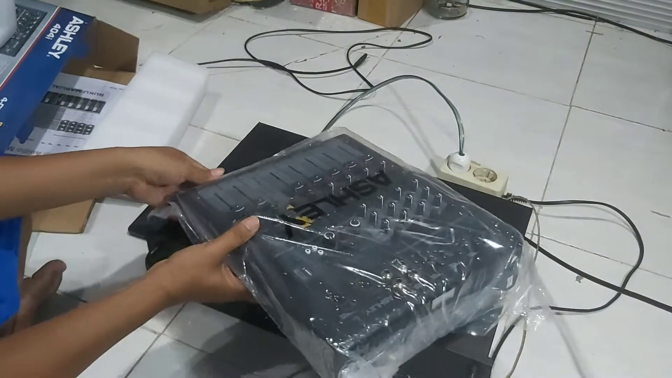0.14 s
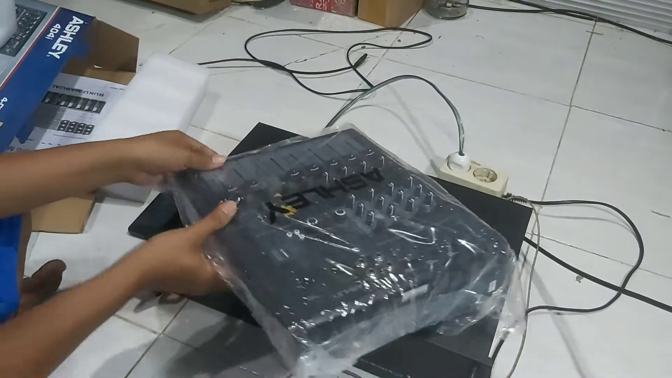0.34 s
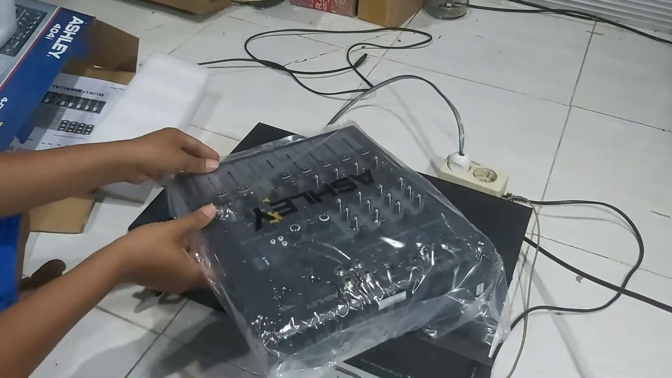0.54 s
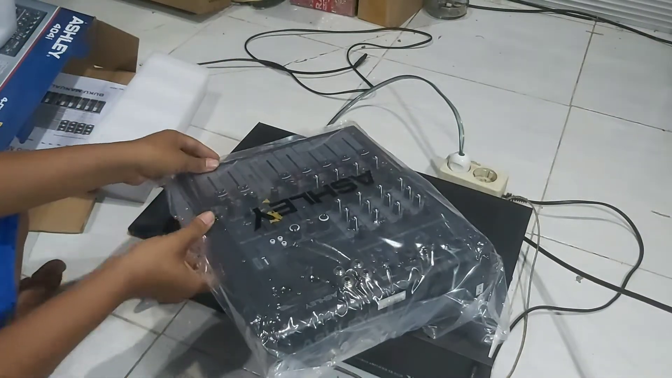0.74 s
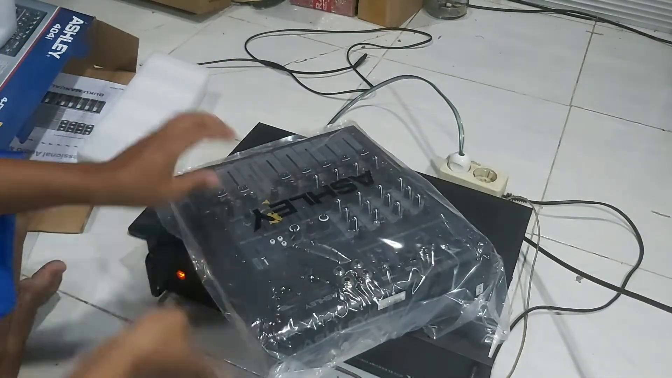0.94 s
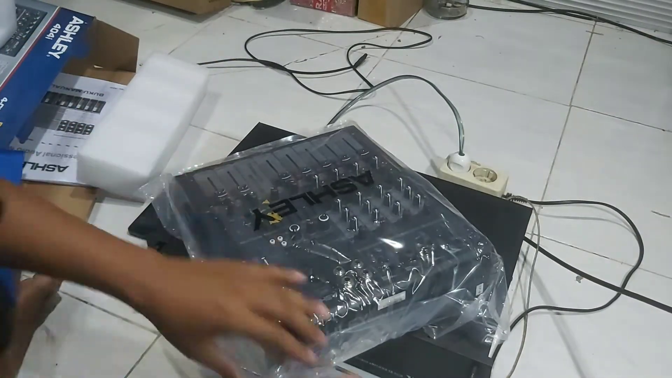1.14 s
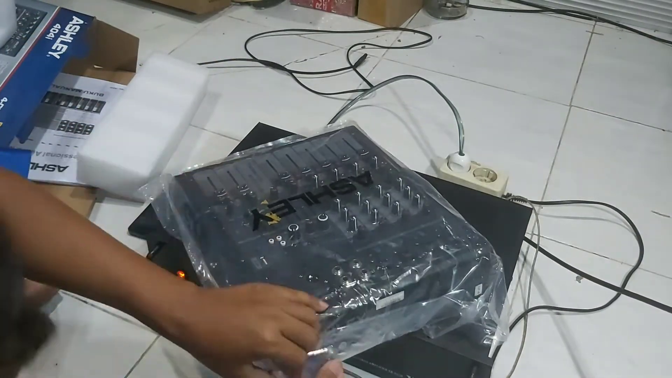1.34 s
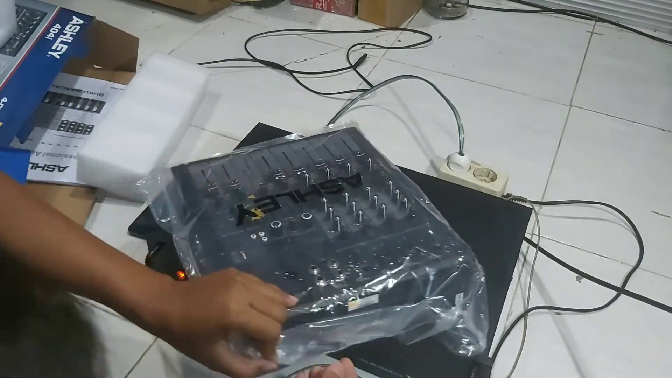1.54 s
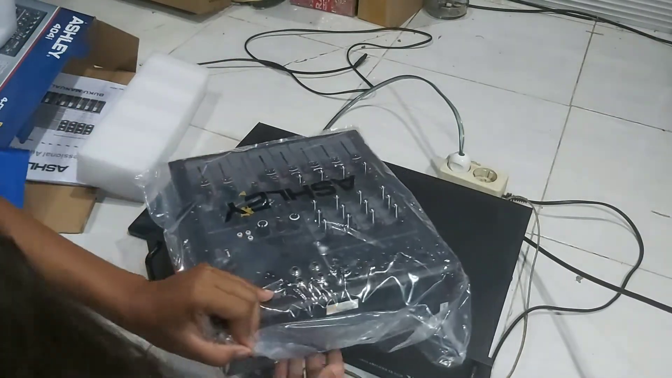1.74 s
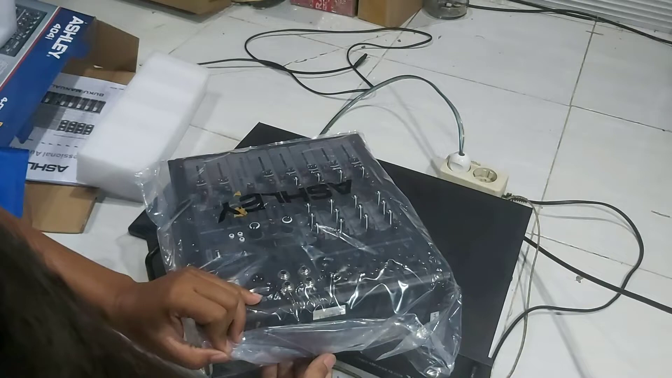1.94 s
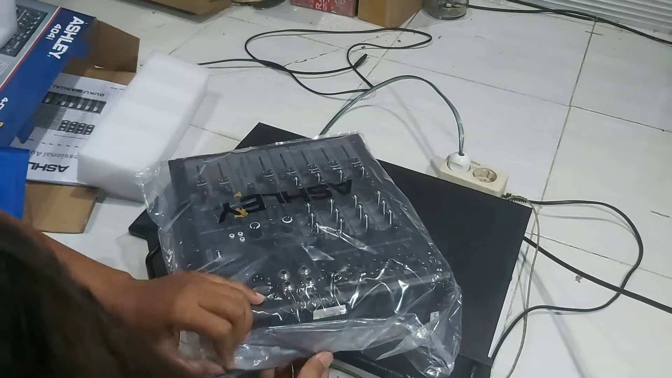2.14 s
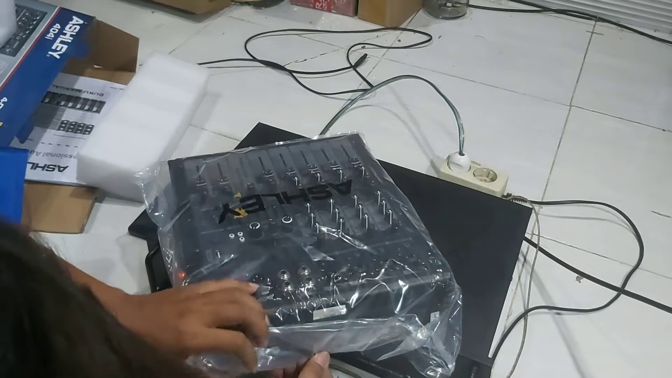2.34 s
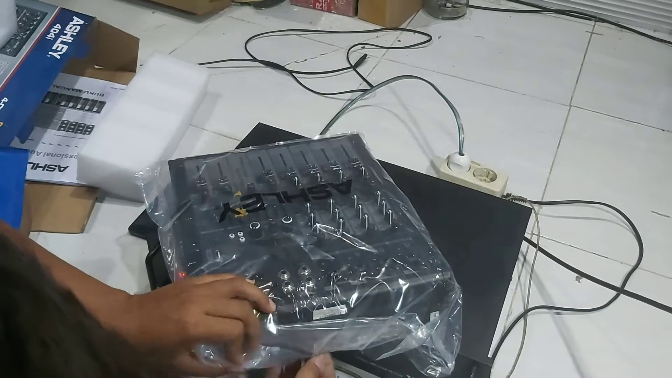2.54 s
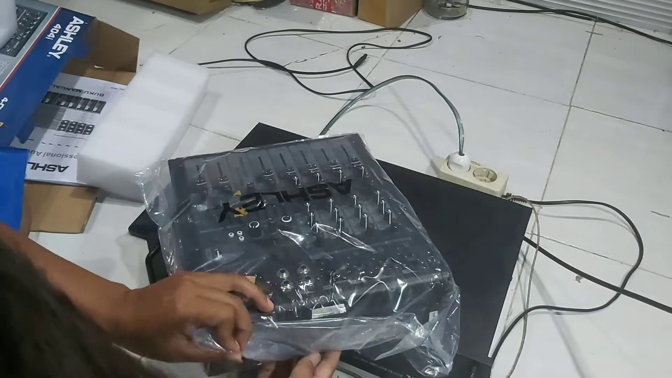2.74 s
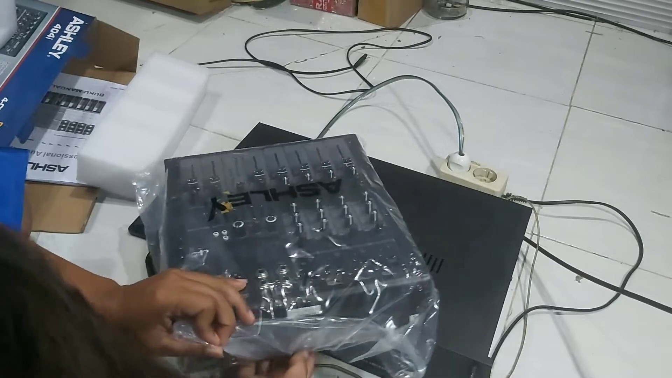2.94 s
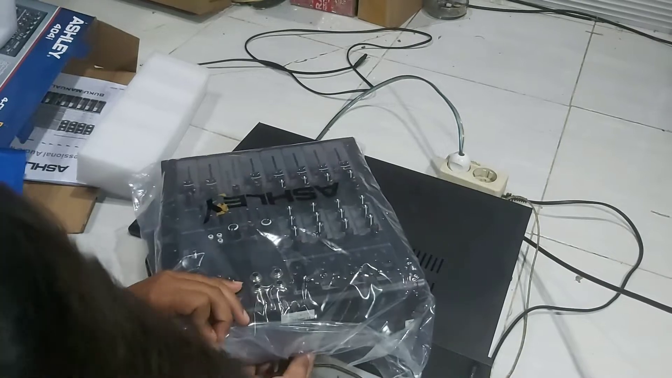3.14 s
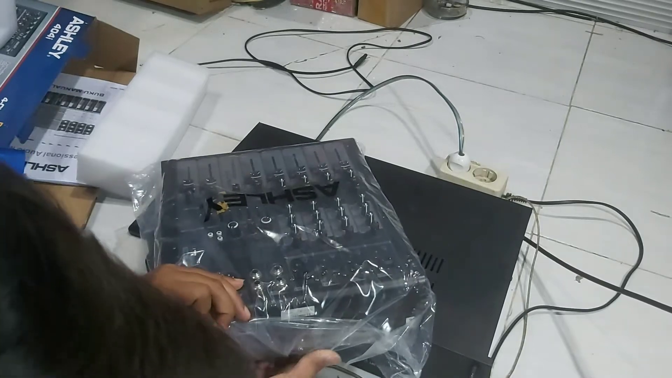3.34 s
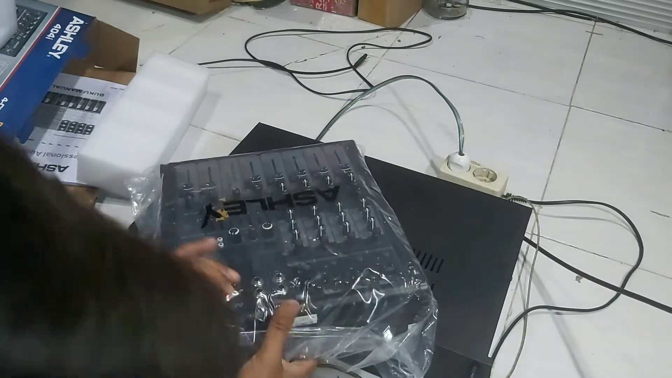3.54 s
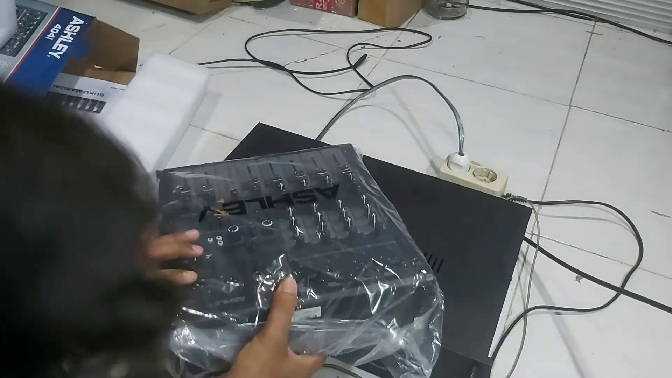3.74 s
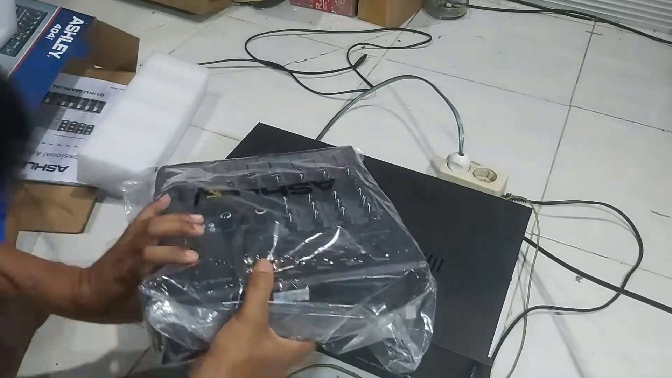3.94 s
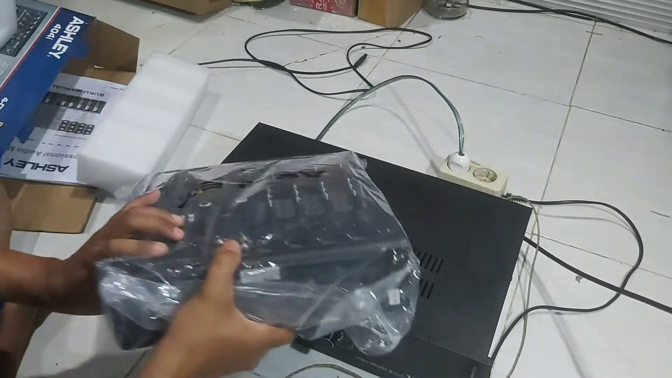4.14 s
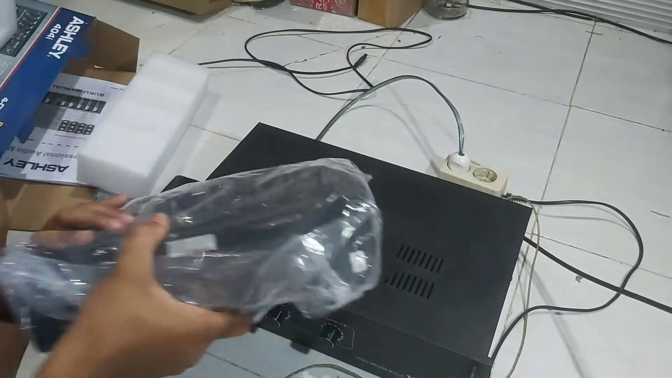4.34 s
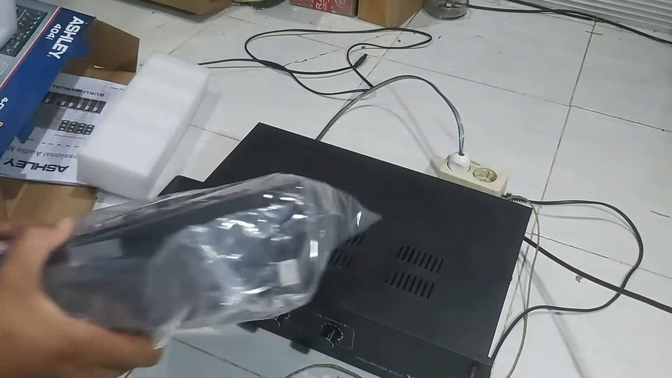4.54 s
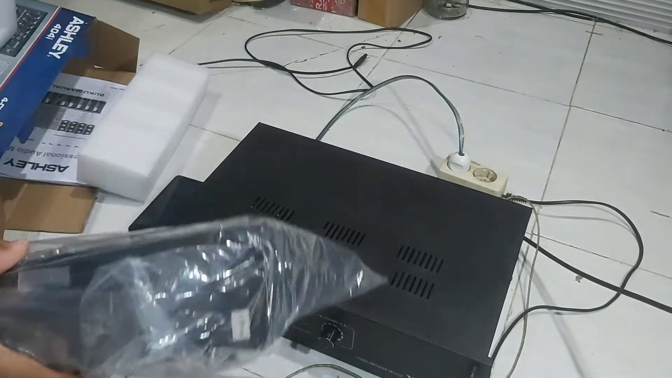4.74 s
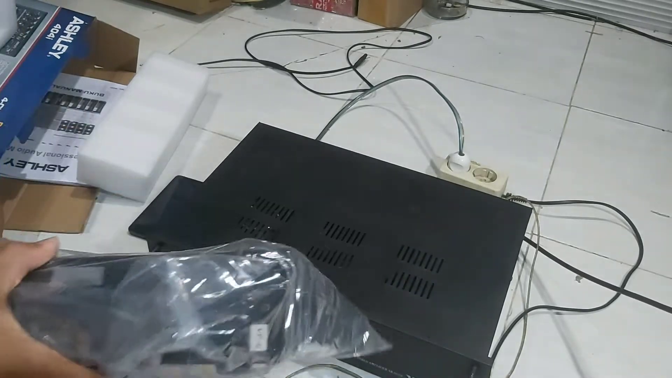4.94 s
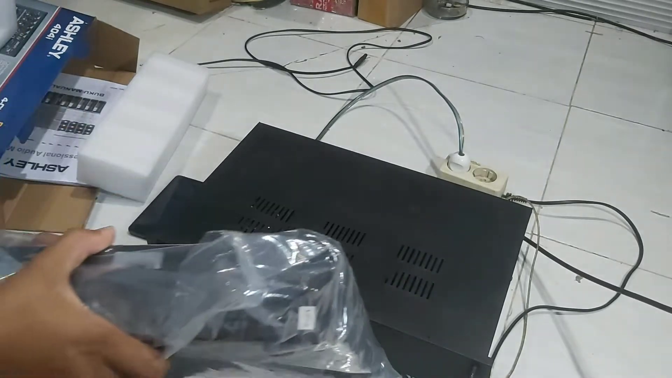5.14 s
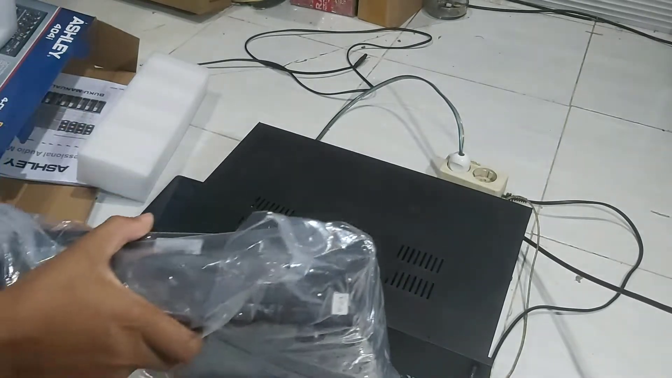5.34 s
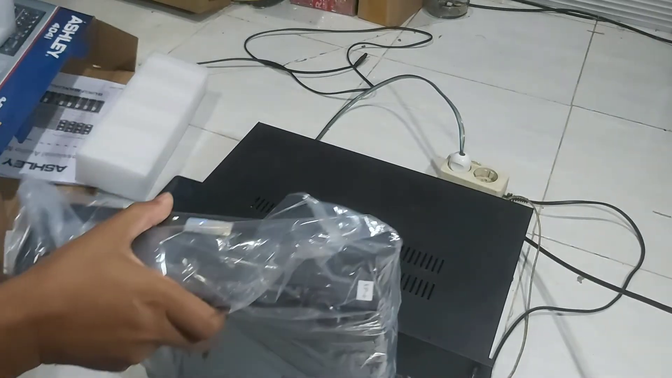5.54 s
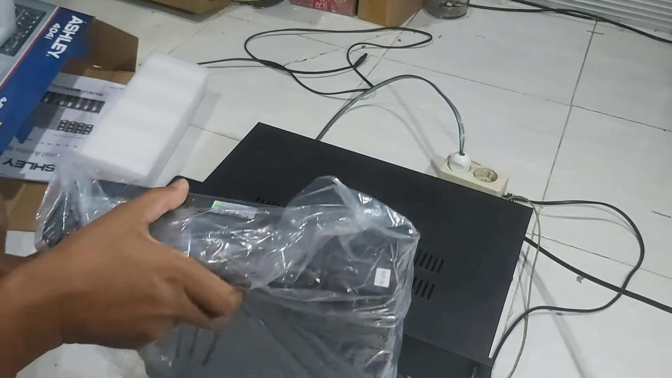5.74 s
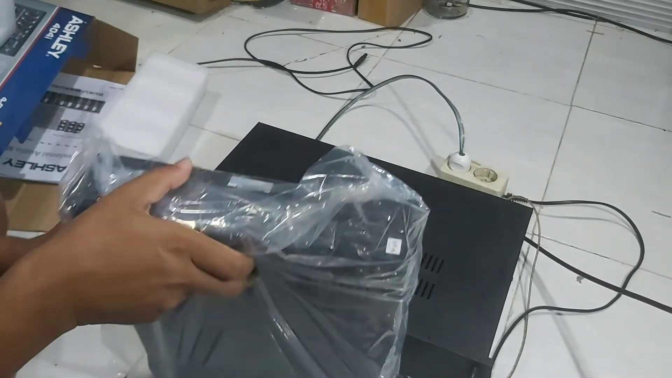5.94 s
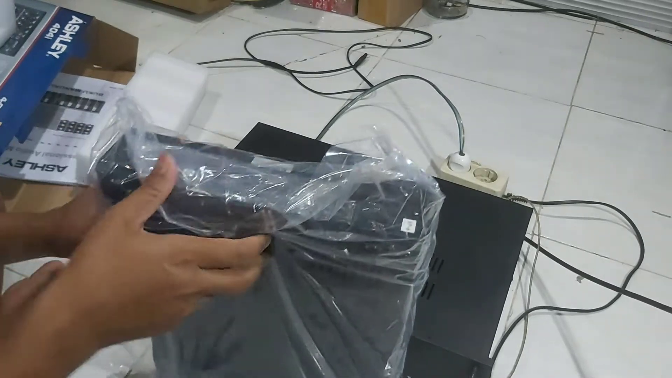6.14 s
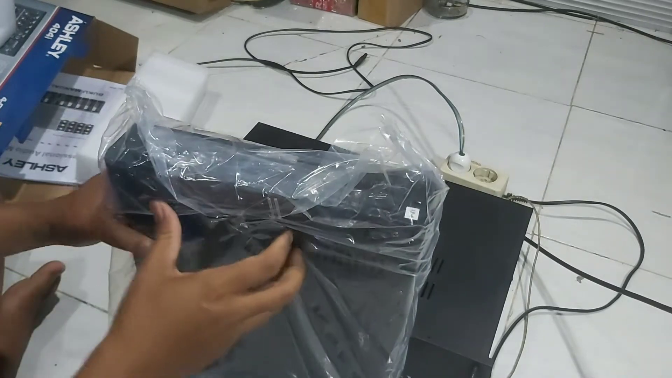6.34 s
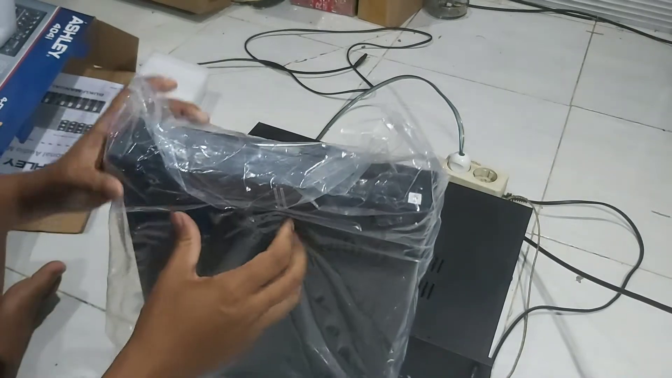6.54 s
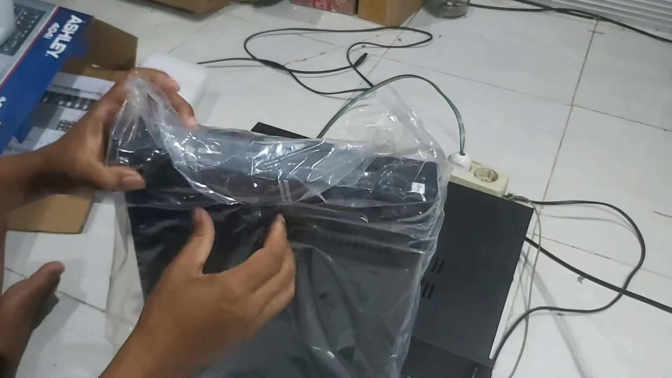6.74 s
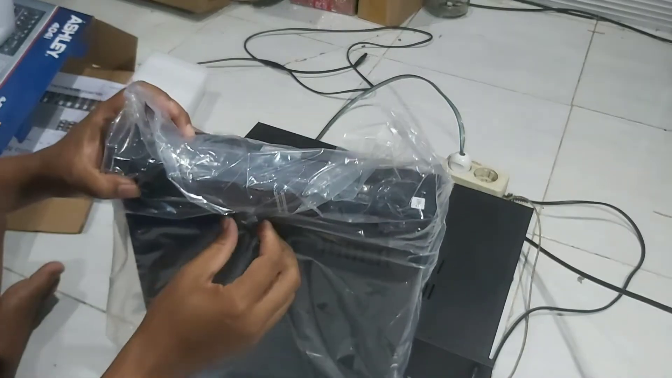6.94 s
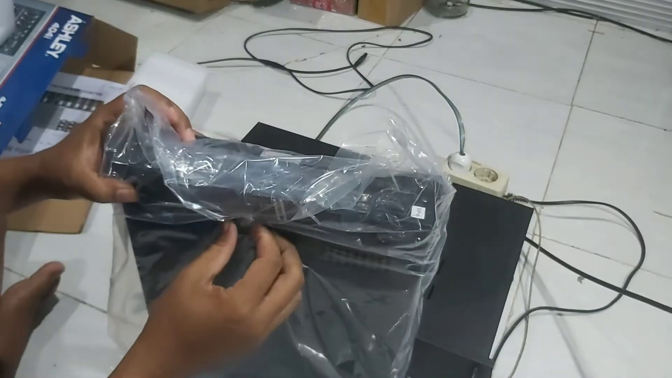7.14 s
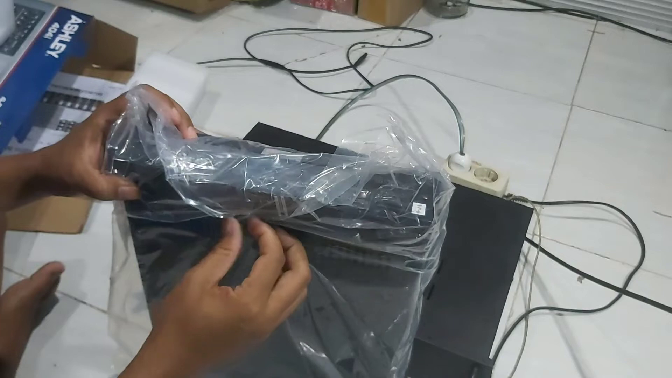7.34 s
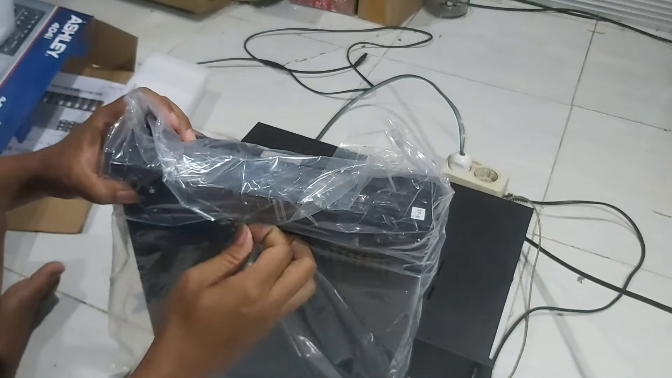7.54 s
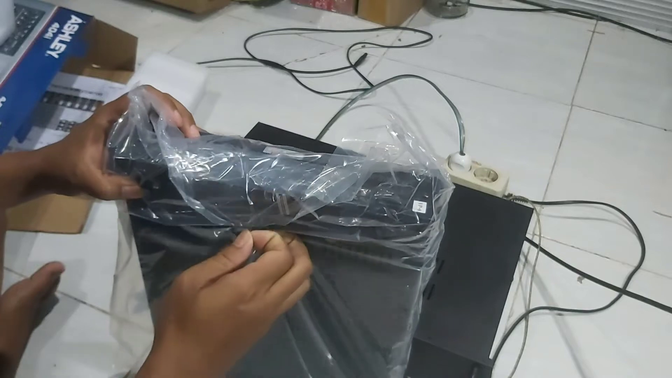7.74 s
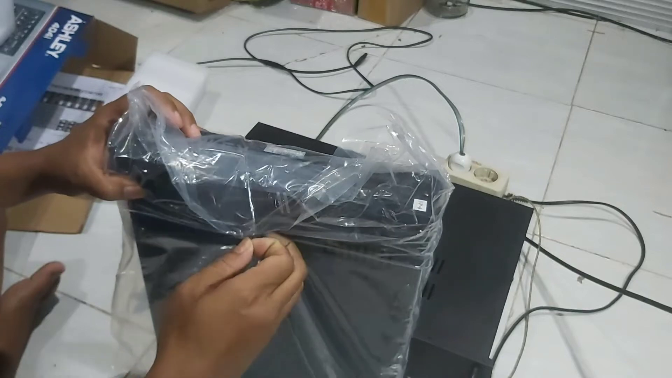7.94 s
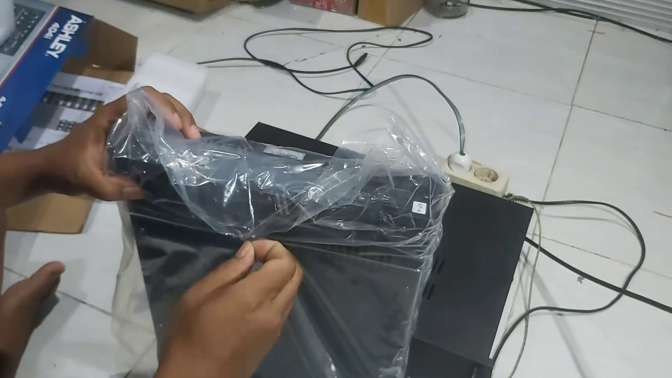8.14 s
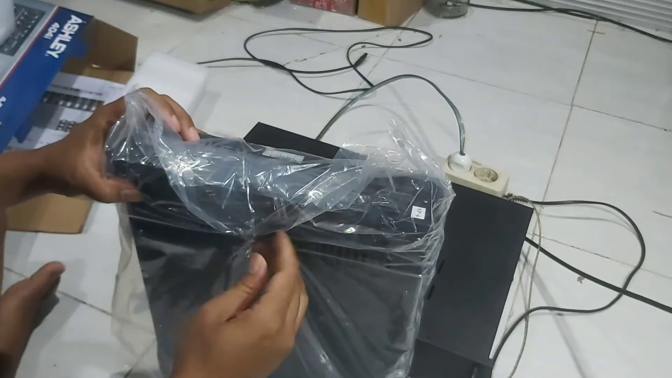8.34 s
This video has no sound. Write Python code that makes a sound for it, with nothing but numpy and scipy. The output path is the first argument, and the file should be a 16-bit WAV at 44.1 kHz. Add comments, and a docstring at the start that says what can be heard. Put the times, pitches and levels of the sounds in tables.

```python
"""Bagged desk on a metal case

Hands turn a mixing desk in its plastic bag on top of a metal equipment case, in a tiled room.
The film crackles in swarms of tiny ringing noise pops, with single sharp snaps on top.
The desk knocks and scrapes: thumps, noise cracks and random slips drive the modes of the hollow case.
A cooling fan hums underneath: wavering sine tones over coloured noise."""
import sys
import numpy as np
from scipy import signal
from scipy.fft import rfft, irfft
from scipy.io import wavfile
from scipy.ndimage import uniform_filter1d

SR = 44100
rng = np.random.default_rng(int(sys.argv[2]) if len(sys.argv) > 2 else 0)


def transcribe(u):
    """Save the signal u as a 16-bit wav file named by the first command-line argument.

    u: samples, shape (n,) or (channels, n), limited to [-1, 1]; the rate is SR.
    q: integer samples, one column per channel.
    """
    v = np.clip(np.atleast_2d(u).T, -1, 1)
    q = np.round(v * 32767).astype(np.int16)
    wavfile.write(sys.argv[1], SR, q)


N = 370440
TIME = np.arange(N) / SR


def undb(db):
    """Decibels to gain."""
    return 10 ** (np.asarray(db) / 20)


def unit(x):
    """Scale to rms 1."""
    return x / np.sqrt(np.mean(x ** 2))


def fade(seconds, length):
    """Exponential decay with this time constant, for a length in samples."""
    return np.exp(-TIME[:length] / max(seconds, 1e-5))


def convolve(x, response):
    """Pass a sound through a response and keep its length."""
    return signal.fftconvolve(np.atleast_2d(x), np.atleast_2d(response), axes=-1)[:, :x.shape[-1]]


def colour(x, points, size=2048):
    """Causal minimum-phase filter with a (f/Hz, level/dB) spectrum and unit power gain."""
    hz, db = np.transpose(points)
    grid = np.maximum(np.fft.rfftfreq(size, 1 / SR), 1)
    log_spectrum = np.log(undb(np.interp(np.log(grid), np.log(hz), db)))
    cepstrum = irfft(log_spectrum)
    # folding the cepstrum forward in time makes the filter causal
    cepstrum[1:size // 2] *= 2
    cepstrum[size // 2 + 1:] = 0
    response = irfft(np.exp(rfft(cepstrum)))
    return convolve(x, response / np.linalg.norm(response))


def resonate(x, hz, q):
    """Band-pass resonance."""
    hz = min(hz, SR / 3)
    return signal.lfilter(*signal.iirpeak(hz, max(q, 3 * hz / SR), fs=SR), x)


def brighten(x, db, corner_hz=6000):
    """Raise or lower the treble."""
    low = signal.sosfiltfilt(signal.butter(2, corner_hz, fs=SR, output="sos"), x)
    return low + (x - low) * undb(db)


def walk(rate):
    """Random drift with a spread near 1, through this many new values a second."""
    knots = rng.standard_normal(int(N / SR * rate) + 2)
    return np.interp(TIME * rate, np.arange(len(knots)), knots)


def pan(db):
    """Left and right gains for a level difference, positive to the left."""
    return undb(np.array([[db], [-db]]) / 2)


def add(out, s, sound):
    """Mix a sound in at a time."""
    start = max(int(s * SR), 0)
    out[:, start:start + sound.shape[-1]] += sound[..., :N - start]


def gesture(s, rise_s, length_s, release_s):
    """Envelope of one hand movement: it builds up, holds and dies away."""
    t = TIME - s
    return np.clip(t / rise_s, 0, 1) * np.exp(-np.maximum(t - length_s, 0) / release_s)


# the hands grip, pull or smooth the bag:
# (t/s, rise/s, time from start to release/s, relative crackle level/dB, treble against that level/dB)
GRIP_MOVES = [(0.0, 0.00031, 0.0094, -32.5, -2), (0.092, 0.016, 0.5, -36, 0),
              (0.222, 0.024, 0.052, -35.5, 12), (0.551, 0.008, 0.028, -27, -2),
              (0.793, 0.022, 0.16, -48.5, -3.5), (1.251, 0.005, 0.42, -37, 0.5),
              (1.378, 0.038, 0.14, -38.5, 8.5), (1.67, 0.015, 0.44, -42.5, -2.5),
              (2.159, 0.021, 0.027, -31, 3.5), (2.24, 0.064, 0.055, -38, 3), (2.429, 0.005, 0.03, -43, 7.5),
              (2.512, 0.045, 0.2, -39.5, 3.5), (2.795, 0.068, 0.24, -32.5, 2),
              (3.166, 0.014, 0.022, -44.5, 4), (3.284, 0.036, 0.072, -39, -4.5),
              (3.476, .01, 0.11, -44.5, 5), (3.55, 0.021, 0.076, -32, -2), (3.684, 0.018, 0.38, -36.5, 3),
              (4.134, 0.016, 0.26, -45.5, -1), (4.271, 0.014, 0.02, -35, -1),
              (4.423, 0.0074, 0.0085, -24.5, -1), (4.5, 0.045, 0.12, -38, -9.5),
              (4.852, 0.1, 0.16, -40, 0.5), (5.261, 0.009, 0.0071, -40, 5),
              (5.341, 0.064, 0.059, -39.5, -6), (5.486, 0.044, 0.22, -40.5, -1.5),
              (5.864, 0.047, 0.049, -36.5, 5.5), (5.967, 0.019, 0.87, -44.5, 1),
              (6.509, 0.017, 0.26, -36.5, 1.5), (6.83, 0.013, 0.34, -49, -15),
              (7.297, 0.044, 0.12, -44.5, 0.5), (7.545, 0.06, 0.17, -43.5, 4.5),
              (7.742, 0.063, 0.35, -42, -2), (8.207, 0.038, 0.038, -35.5, 1),
              (8.334, .015, 0.018, -41.5, -5)]
GRIP_RELEASE_S = 0.045  # the film settles after the hand stops
REST_DB, REST_TREBLE_DB = -60.5, 2.5  # the bag stirs faintly between grips


def effort():
    """Strength of the crackle and of its treble; overlapping grips add in power."""
    body = np.full(N, undb(REST_DB) ** 2)
    treble = np.full(N, undb(REST_DB + REST_TREBLE_DB) ** 2)
    for s, rise_s, length_s, db, treble_db in GRIP_MOVES:
        power = (undb(db) * gesture(s, rise_s, length_s, GRIP_RELEASE_S)) ** 2
        body += power
        treble += power * undb(treble_db) ** 2
    return np.sqrt(body), np.sqrt(treble)


FLUTTER_S = .0045  # decay constant


def buckle(hz, pop_s, own_db, q, flutter_db=-15, tick_db=9, size=512):
    """Folds flip, one per row: a hard tick, a pop that rings at the fold's pitch, then the sheet flutters."""
    hz, pop_s, own_db = (np.reshape(v, (-1, 1, 1)) for v in (hz, pop_s, own_db))
    noise = rng.standard_normal((len(hz), 3, size))
    ears = noise[:, :1] + 1.35 * noise[:, 1:]  # a shared part, and each ear's own
    pop = ears * (np.exp(-TIME[:size] / pop_s) + undb(flutter_db) * fade(FLUTTER_S, size))
    pop[..., 0] = undb(tick_db)
    f = np.maximum(np.fft.rfftfreq(size, 1 / SR), 1)
    ring = 1 + undb(own_db) / (1 + 1j * q * (f / hz - hz / f))
    low_cut = f / (f - .5j * hz)  # an octave below the fold's pitch
    pop = irfft(rfft(pop) * ring * low_cut)
    return pop / np.sqrt(np.mean(pop ** 2, axis=(1, 2), keepdims=True))


def small_snaps(level_db=-3.0, spread_db=3, ring_db=12, low_hz=1500, pop_s=0.002, count=190):
    """Lesser creases tick at random moments, each at a clear pitch; higher ones pop shorter."""
    out = np.zeros((2, N))
    when, pitch, size, place = rng.random((count, 4)).T
    pops = buckle(low_hz * 3.5 ** pitch, pop_s * 2 ** -pitch, ring_db, q=3.7, size=1024)
    levels_db = level_db + spread_db * (2 * size - 1)
    for s, pop, db, side_db in zip(when * N / SR, pops, levels_db, 6 * (place - .5)):
        add(out, s, pop * undb(db) * pan(side_db))
    return out


# colour of the crackling film: (f/Hz, relative level/dB)
FILM_COLOUR = [(59, -13), (100, 11), (230, 12.5), (335, 8.5), (524, -1), (608, 3.5), (910, -6), (1870, -9),
               (6020, -17.5), (7290, -27.5), (11900, -26), (14700, -36), (16000, -40)]


def crackle(strength, treble, own_db=10, own_spread_db=8, rub_db=-14.5, treble_db=2.5, level_db=1.0,
            count=7500):
    """Many folds, each with its own pitch and place, buckle at random over the hiss of rubbing film."""
    when, pitch, size, purity, place = rng.random((count, 5)).T
    hz = 900 * 16 ** pitch
    pop_s = .0004 + 1.2 / hz
    pops = buckle(hz, pop_s, own_db + own_spread_db * (2 * purity - 1), q=3.9)
    size_db = np.minimum(-5.5 * np.log(1 - size), 19)  # many small pops, few big ones
    gains = undb(size_db) * (hz / 4000) ** .4
    bursts = np.cumsum(undb(3 * walk(45)))  # folds give way in little avalanches
    times = np.searchsorted(bursts, when * bursts[-1]) / SR
    swarm = np.zeros((2, N))
    for s, pop, gain, side in zip(times, pops, gains, place - .5):
        add(swarm, s, pop * gain * np.array([[1 + side], [1 - side]]))
    hiss = undb(rub_db) * rng.standard_normal((2, N))
    swarm = colour(unit(swarm) + hiss, FILM_COLOUR)
    swarm = signal.sosfilt(signal.butter(2, 420, "high", fs=SR, output="sos"), swarm)
    # even the power over 50 ms, so the work of the hands sets what the swarm releases
    swarm /= np.sqrt(uniform_filter1d(np.mean(swarm ** 2, axis=0), SR // 20))
    swarm += small_snaps()
    low = brighten(swarm, -np.inf)
    return (low * strength + (swarm - low) * treble * undb(treble_db)) * undb(level_db)


# low wavering hum tones: (f/Hz, rms level before the waver/dB)
HUM_TONES = [(50, -59), (304, -51.5)]
# colour of the fan's air: (f/Hz, relative level/dB)
AIR_COLOUR = [(15, -67), (25, -22), (60, -13.5), (195, -9.5), (480, -12.5), (690, -10), (1000, -17.5),
              (1400, -21.5), (2500, -43), (15000, -50)]
# the desk muffles the fan's vents until it is lifted off
FAN_COVERED_DB, FAN_OPEN_DB, LIFT_S, LIFT_LENGTH_S = -53, -47.5, 2.7, 0.29


def fan(blade_hz=337.5, air_db=-46, waver_db=2, wobble=0.0033):
    """Wavering tones over the soft rush of air; the main tone grows as the vents are uncovered."""
    def tone(hz):
        """Sine of rms 1 before its level wavers; pitch and level drift at random."""
        drifting_hz = hz * (1 + wobble * walk(30))
        return np.sqrt(2) * np.sin(2 * np.pi * np.cumsum(drifting_hz) / SR) * undb(waver_db * walk(7))
    blade_db = np.interp(TIME, [LIFT_S, LIFT_S + LIFT_LENGTH_S], [FAN_COVERED_DB, FAN_OPEN_DB])
    tones = tone(blade_hz) * undb(blade_db) + sum(tone(hz) * undb(db) for hz, db in HUM_TONES)
    air = colour(rng.standard_normal(N) + 0.49 * rng.standard_normal((2, N)), AIR_COLOUR)
    return tones + undb(air_db) * unit(air)


# modes of the hollow case: (f/Hz, relative level/dB, t60/s)
CASE_MODES = [(184, -18, 0.5), (252, -4, 0.65), (282.7, 1, 0.56), (302.5, 1, 0.33), (332.7, -1.5, 0.2),
              (359.8, 1, 0.31), (386, -2, 0.07), (445.4, 2, 0.24), (531.3, -2, 0.16), (576, -4.5, 0.18),
              (718, -7, 0.22), (820, -34, 0.19), (1100, -10, 0.4), (1336, -20, 0.41)]


def case_ring(spot_hz, focus_db=5):
    """Response of the hollow case; a mode weakens by focus_db per octave from the struck spot's pitch."""
    t = TIME[:SR]
    ring = 0
    for k, (hz, db, t60) in enumerate(CASE_MODES):
        mode_db = db - focus_db * abs(np.log2(hz / spot_hz)) - 60 * t / t60
        ring = ring + (-1) ** k * undb(mode_db) * np.sin(2 * np.pi * hz * t)
    return ring


# colour of the scrape: (f/Hz, relative level/dB)
SCRAPE_COLOUR = [(35, -68), (60, -27), (189, -8), (219, -19.5), (335, 2), (382, -9.5), (757, -13),
                 (1300, -29.5), (3790, -44), (6000, -80)]
# the desk is pushed across the lid: (t/s, rise/s, time from start to release/s, relative level/dB)
PUSH_MOVES = [(0.0, 0.00072, 0.077, -29), (0.183, 0.027, 0.66, -42), (1.27, 0.27, 0.18, -34.5),
              (2.474, 0.046, 0.083, -39.5), (2.824, 0.15, 0.3, -37.5), (3.605, 0.051, 0.49, -38),
              (4.132, 0.12, 0.14, -23), (4.49, 0.071, 0.11, -29.5)]
PUSH_RELEASE_S = 0.04
UNDER_RUB_DB = -2.5  # a faint low rubbing under the crackle rises and falls with each grip


def slide(strength, rate=900, ring_db=-8, scrape_db=-1, level_db=1.0):
    """Stick and slip on the lid, plus a low rubbing under the crackle: random slips ring the case."""
    slips = (rng.random(N) < rate / SR) * rng.standard_normal(N)  # about `rate` a second
    lid = unit(convolve(slips, case_ring(spot_hz=490, focus_db=7)))
    rub = undb(scrape_db) * unit(colour(slips, SCRAPE_COLOUR)) + undb(ring_db) * lid
    rub /= np.sqrt(uniform_filter1d(rub ** 2, SR // 40) + 1e-3)  # a steady push keeps its power even
    push = sum(undb(db) * gesture(s, rise_s, length_s, PUSH_RELEASE_S)
               for s, rise_s, length_s, db in PUSH_MOVES)
    return undb(level_db) * rub * np.hypot(push, undb(UNDER_RUB_DB) * strength)


# colour of the dull crack at the contact: (f/Hz, relative level/dB)
CONTACT_COLOUR = [(40, -12), (120, 4), (300, -0.5), (700, 2.5), (1500, -7), (2800, -19), (6000, -38),
                  (15000, -25)]
# the desk knocks on the case: (t/s, thump level/dB, ring trim/dB, crack trim/dB,
# pitch of the struck spot f/Hz, clatter decay constant/s)
KNOCK_HITS = [(.008, -15.5, -3, -4, 345, 0.045), (0.043, -17.5, -0.5, -9, 333, 0.028),
              (.6055, -8.5, -6, 6, 390, 0.0096), (0.6101, -2, 2.5, 5, 365, 0.041),
              (0.846, -26.5, 4.5, -10, 280, 0.053), (1.9935, -16.5, -3, -1, 293, 0.036),
              (2.0037, -18, -4, 4, 288, 0.026), (2.176, -25.5, -7, 5, 566, 0.032),
              (2.937, -14, -8, 7, 290, 0.044), (2.947, -4, -4.5, 3, 364, 0.019),
              (2.965, -10.5, -12, 1, 269, 0.025), (3.576, -11.5, -7, 11, 316, 0.018),
              (3.591, -7.5, 0, -5, 284, .025), (3.633, -13.5, -2.5, 2, 285, 0.036),
              (3.6477, -12, -1, -7, 280, 0.015), (3.746, -11, -11, 0.5, 670, 0.0044),
              (4.44, -13, 4, 15.5, 516, 0.02), (4.463, -8.5, 2.5, 8.5, 420, 0.096),
              (4.515, -13.5, 0.5, -10, 340, 0.034), (5.358, -21, -7, 8, 300, 0.017),
              (6.1636, -13, -8.5, -2, 660, 0.0031)]


def knocks(ring_db=-15, crack_db=-17, crack_s=0.015, rattle_db=-10, thump_cycles=2.66, rise_share=0.037,
           chatter=0.24):
    """Each blow dents the lid in a round thump, rings the case and lets the desk's feet clatter."""
    out = np.zeros((2, N))
    for s, db, boom_db, hard_db, spot_hz, clatter_s in KNOCK_HITS:
        # the longer the desk rocks, the softer the contact begins
        contact = 1 - fade(rise_share * clatter_s, SR)
        thump = np.sin(2 * np.pi * spot_hz * TIME[:SR]) * fade(thump_cycles / spot_hz, SR) * contact
        rebounds = rng.standard_normal(SR) * fade(clatter_s, SR)
        blow = signal.unit_impulse(SR) + chatter * rebounds / np.linalg.norm(rebounds)
        body = convolve(blow, case_ring(spot_hz))
        body /= np.std(body[:, :SR // 10])
        grit = rng.standard_normal(SR) + 0.34 * rng.standard_normal((2, SR))
        decay = fade(min(crack_s, clatter_s / 3), SR) + undb(rattle_db) * fade(2 * clatter_s, SR)
        crack = colour(grit * contact * decay, CONTACT_COLOUR)
        crack *= np.sqrt(SR / 100) / np.linalg.norm(crack[0])
        ring = undb(ring_db + boom_db) * body
        add(out, s, undb(db) * (thump + ring + undb(crack_db + hard_db) * crack))
    return out


# colour of a snapping crease: (f/Hz, relative level/dB)
CREASE_COLOUR = [(150, -3), (600, 8), (2000, 2.5), (5000, -1.5), (8000, -1), (12500, -0.5), (16000, -17)]
# large creases that snap through:
# (t/s, relative level/dB, relative treble/dB, pitch of the fold f/Hz, crunch decay constant/s)
SNAP_HITS = [(0.12, -31, -14, 2050, .001), (0.138, -25.5, -12, 3120, 0.0032),
             (0.178, -24, -24, 3150, 0.0009), (0.248, -21, -5, 1500, 0.0015),
             (0.283, -21, -7, 2400, 0.0021), (0.445, -24, 0, 2280, 0.0053),
             (.474, -17.5, -16, 2720, 0.0025), (0.558, -18, -3, 2300, 0.0016), (.576, -17, 6, 4240, 0.0048),
             (0.596, -25, 5, 3460, .001), (0.97, -34, -3, 4390, .003), (1.087, -33, -30, 1940, 0.0018),
             (1.2286, -31.5, -15, 6460, 0.002), (1.258, -34, -14, 3030, 0.0032),
             (1.2915, -26.5, -15, 4800, .0012), (1.434, -17.5, -2, 2000, 0.00085),
             (1.444, -18, -6, 5100, 0.0069), (1.517, -24.5, 1, 1830, .0008),
             (1.636, -21.5, 1, 3500, 0.00091), (1.769, -32, -3, 3020, .0008),
             (2.1774, -19.5, -9, 1620, 0.0018), (2.186, -28, -10, 1700, .0015),
             (2.435, -31, -2, 4620, 0.00098), (2.525, -27.5, 0, 1410, 0.0066),
             (2.817, -26, -4, 2070, 0.003), (3.02, -23.5, -23, 1520, 0.0018),
             (3.593, -19, -6, 4260, 0.0031), (3.718, -24.5, -21, 2060, 0.0021),
             (3.742, -17, 2, 2520, 0.0018), (3.963, -20.5, -6, 2780, 0.0077),
             (4.02, -23.5, 3, 3400, 0.0012), (4.419, -26.5, -8, 2500, 0.0038),
             (4.715, -28, -2, 3140, 0.0051), (4.905, -32, -18, 3720, 0.0012),
             (5.027, -28, -7, 1750, 0.0016), (5.35, -30, -22, 1440, 0.0022),
             (5.382, -27.5, -9, 5000, 0.0023), (5.494, -29, -9, 6160, 0.0024),
             (5.5416, -25, 1, 6100, 0.0015), (5.569, -24.5, -8, 1900, 0.0014),
             (5.623, -22, -5.5, 1270, 0.00047), (5.694, -18.5, -13, 1410, 0.0021),
             (5.884, -28.5, -7, 2120, 0.0018), (5.916, -21.5, 3, 1670, 0.008),
             (5.9785, -18.5, -6, 2000, 0.0043), (6.1623, -18, -17, 1740, 0.00099),
             (6.379, -22, -4, 5500, 0.00075), (6.665, -24.5, -14, 3000, 0.0053),
             (6.745, -25, -8, 3200, 0.00092), (6.761, -22, 5, 5450, 0.0051), (6.958, -39, -14, 2600, .002),
             (7.086, -27.5, 1, 3840, 0.0052), (7.136, -36, -14, 2800, .002),
             (7.377, -30.5, 1, 4500, 0.0018), (7.4045, -27.5, -10, 1900, 0.0015),
             (7.596, -34, 7, 3420, 0.00098), (7.619, -25, 0, 3940, 0.0037), (7.69, -27.5, -2, 4220, .0012),
             (7.74, -15, -12.5, 11800, 0.00048), (7.778, -26.5, -16, 2560, 0.0034),
             (7.816, -24.5, -17, 2800, 0.0011), (7.86, -26, -22, 880, 0.0099),
             (7.901, -19.5, -10, 2340, 0.01), (7.955, -28, 0, 2400, 0.0022),
             (7.991, -30.5, -10, 2180, .0025), (8.035, -33, -25, 1930, 0.00089),
             (8.075, -29, 3, 1900, 0.0007), (8.08, -28.5, -13, 2100, .003), (8.15, -33, -22, 2060, 0.0027),
             (8.24, -26.5, -16, 1610, 0.009), (8.253, -20.5, -1, 1900, 0.0069)]


def snaps(treble_db=6, level_db=-9, ring_db=9, ring_q=4):
    """Large creases snap or crunch through one at a time, each ringing briefly at its own pitch."""
    out = np.zeros((2, N))
    for s, db, bright_db, hz, length_s in SNAP_HITS:
        pop = buckle(hz, length_s, ring_db, ring_q, flutter_db=-6.5, tick_db=14.5, size=1024)
        pop = brighten(colour(pop[0], CREASE_COLOUR), bright_db + treble_db)
        add(out, s, unit(pop) * undb(db + level_db) * pan(2 * rng.standard_normal() - 1))
    return out


# soft bumps of the hands and the desk's weight: (t/s, level/dB, centre of the sagging pitch f/Hz)
BUMP_HITS = [(2.808, -32, 110), (3.577, -30, 104), (4.44, -28.5, 64.4), (5.345, -27.5, 144),
             (6.19, -35, 143), (6.621, -30.5, 113)]


def bumps(swell_s=0.025, level_db=0, sag=0.35, thud_db=-8):
    """A soft palm gives a dull thud and wakes one low resonance, which sags as the pressure eases."""
    out = np.zeros((2, N))
    for s, db, hz in BUMP_HITS:
        sagging_hz = hz * (1 + sag * (fade(2 * swell_s, SR) - .5))
        tone = np.sin(2 * np.pi * np.cumsum(sagging_hz) / SR)
        thud = unit(colour(rng.standard_normal(SR), [(30, -12), (70, 0), (200, 6), (500, -23), (3000, -52)]))
        press = (np.e * TIME[:SR] / swell_s * fade(swell_s, SR)) ** 2  # peaks at 1 after swell_s
        add(out, s, undb(db + level_db) * (tone + undb(thud_db) * thud) * press)
    return out


# a hand glides over taut film: (t/s, rise/s, time from start to release/s, level/dB)
GLIDE_MOVES = [(4.19, 0.03, 0.087, -46), (5.045, 0.039, 0.09, -44.5)]


def glide(hz=6100, q=4, release_s=0.066):
    """Skin on taut film gives a brief narrow hiss: noise through two equal resonances."""
    touch = sum(undb(db) * gesture(s, rise_s, length_s, release_s)
                for s, rise_s, length_s, db in GLIDE_MOVES)
    hiss = resonate(resonate(rng.standard_normal((2, N)), hz, q), hz, q)
    return unit(hiss) * touch


BAG_PAN_DB = -0.94  # left against right


def shaded(film):
    """The bag lies a little to the right, so its treble is weaker on the left."""
    return np.array([film[0] - .5 * resonate(film[0], 7400, 0.8), film[1]]) * pan(BAG_PAN_DB)


# reverberation of the tiled room: (f/Hz, t60/s)
ROOM_DECAY = [(150, 0.66), (600, 0.32), (2500, 0.25), (6000, 0.16), (14000, 0.19)]


def room(x, wet_db, wide_hz=900):
    """Tiles and walls return a dense noise tail, alike in both ears in the bass."""
    hz, t60 = np.transpose(ROOM_DECAY)
    f, t, (mid, side) = signal.stft(rng.standard_normal((2, SR * 2 // 3)), SR)
    width = np.minimum(f / wide_hz, 1)[:, None]
    decay = undb(-60 * t / np.interp(f, hz, t60)[:, None])
    tail = signal.istft(np.array([mid + width * side, mid - width * side]) * decay, SR)[1]
    tail[:, :SR // 500] = 0  # the tail waits 2 ms
    return x + undb(wet_db) * convolve(x, tail / np.linalg.norm(tail[0]))


def scene():
    """Bag and case in the room, over the fan; the large creases face the microphone and sound drier."""
    strength, treble = effort()
    rustle = room(shaded(crackle(strength, treble) + glide()), wet_db=-2.0)
    case = room(knocks() + slide(strength), wet_db=-7) + room(bumps(), wet_db=-11)
    creases = room(shaded(snaps()), wet_db=-7.5)
    return rustle + creases + case + fan()


TOP_HZ = 15700


def record(dry):
    """The right port hears 2 samples later; the phone clips at full scale and cuts deep bass and top."""
    dry = np.array([dry[0], np.pad(dry[1], (2, 0))[:N]])
    dry = signal.sosfilt(signal.butter(2, 38, "high", fs=SR, output="sos"), np.clip(dry, -1, 1))
    return signal.sosfilt(signal.ellip(8, .2, 70, TOP_HZ, fs=SR, output="sos"), dry)


dry = scene()
out = record(dry)
transcribe(out)
```